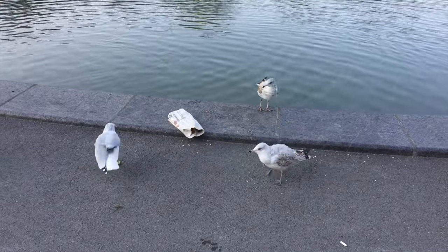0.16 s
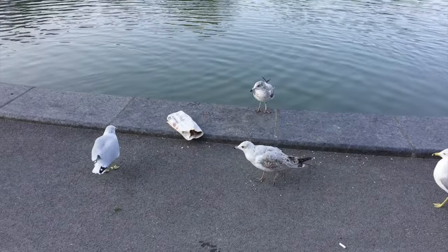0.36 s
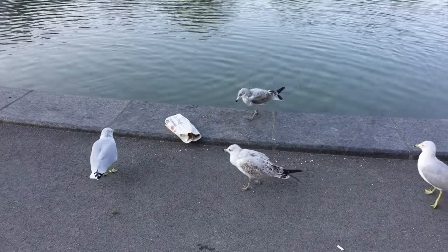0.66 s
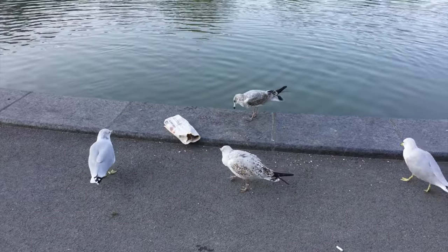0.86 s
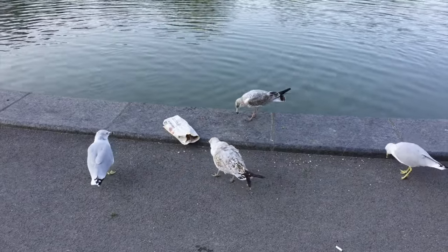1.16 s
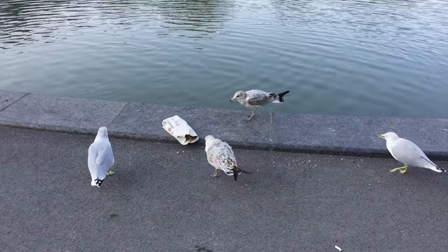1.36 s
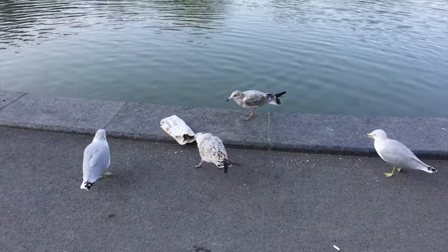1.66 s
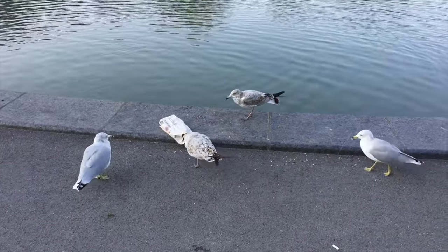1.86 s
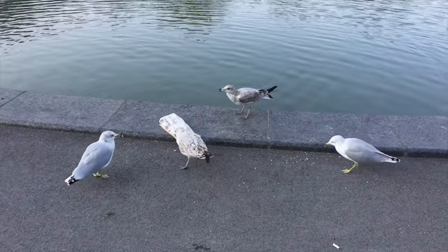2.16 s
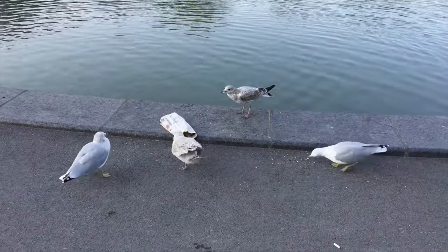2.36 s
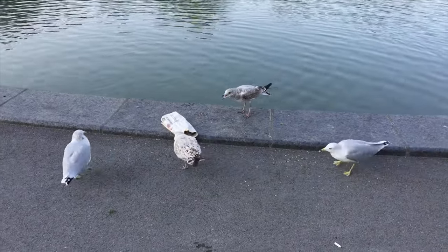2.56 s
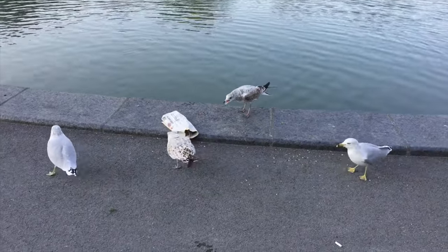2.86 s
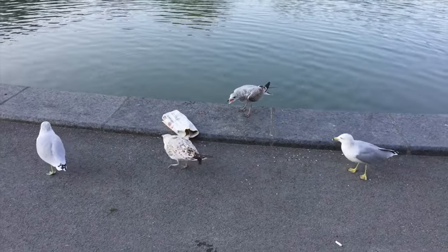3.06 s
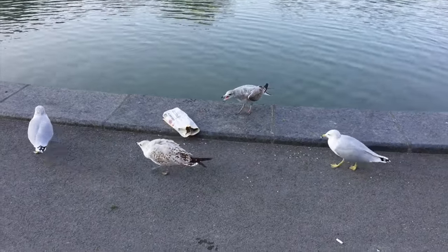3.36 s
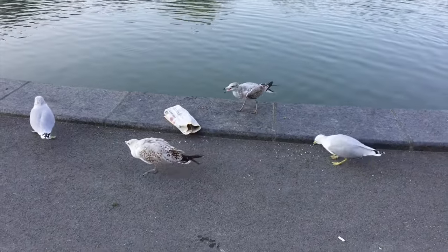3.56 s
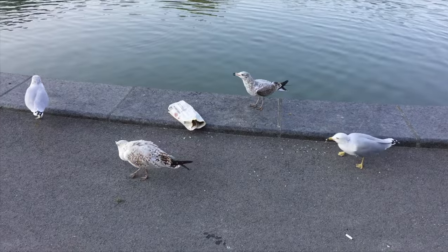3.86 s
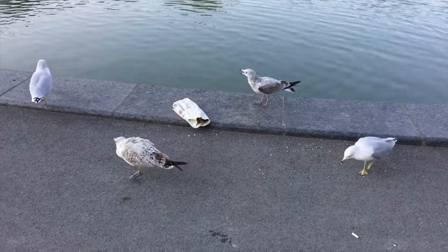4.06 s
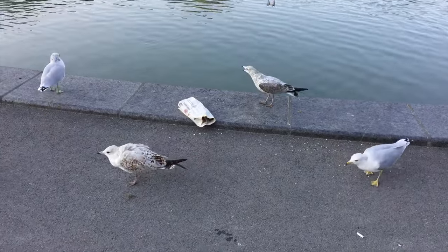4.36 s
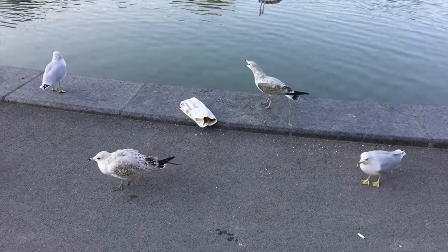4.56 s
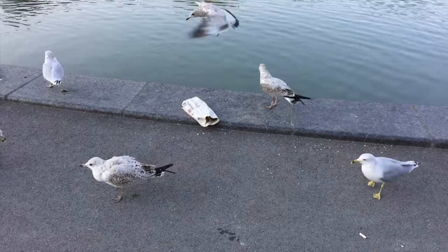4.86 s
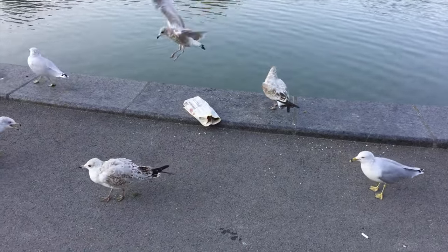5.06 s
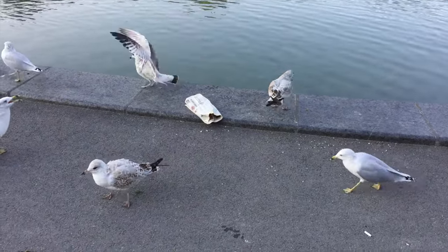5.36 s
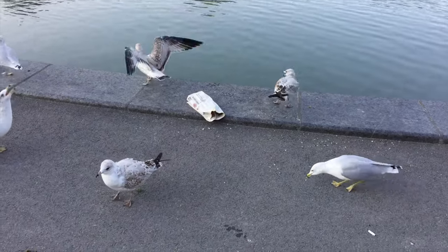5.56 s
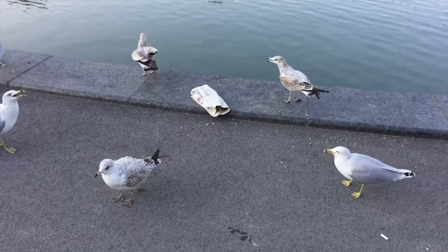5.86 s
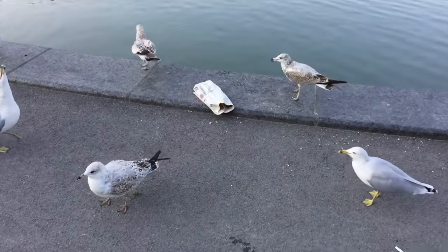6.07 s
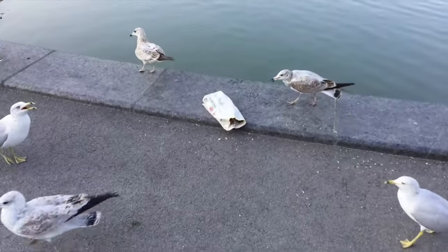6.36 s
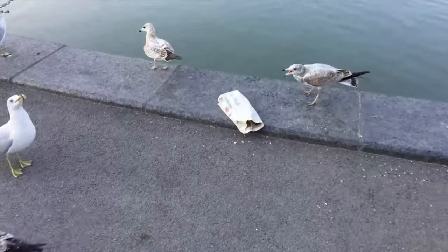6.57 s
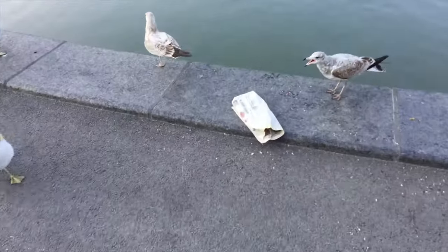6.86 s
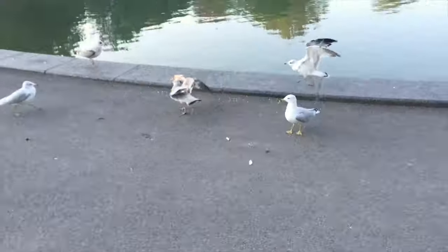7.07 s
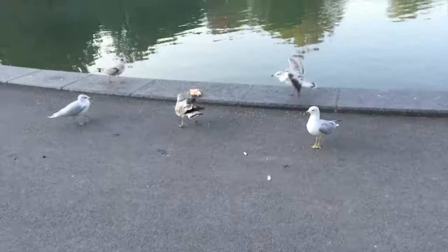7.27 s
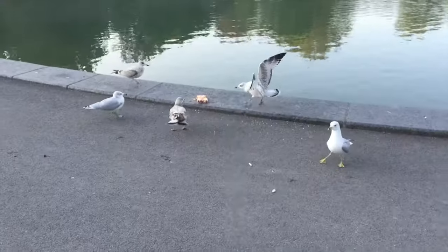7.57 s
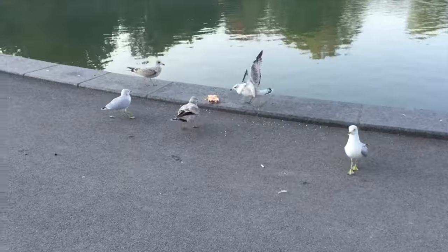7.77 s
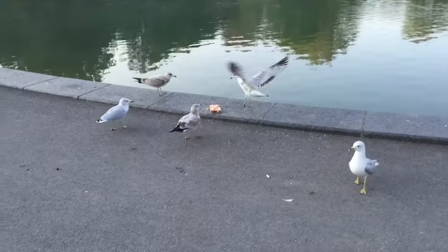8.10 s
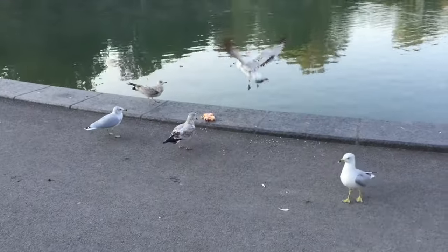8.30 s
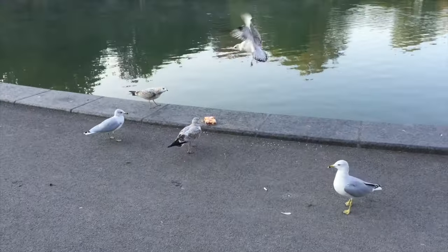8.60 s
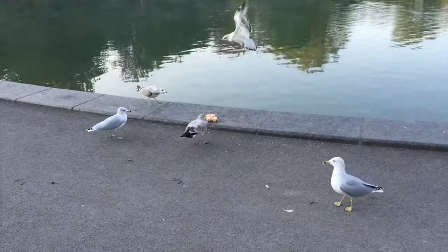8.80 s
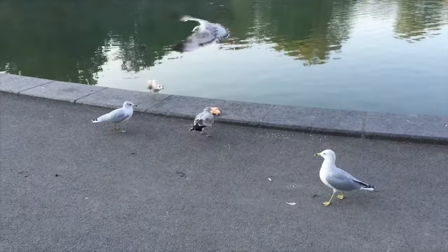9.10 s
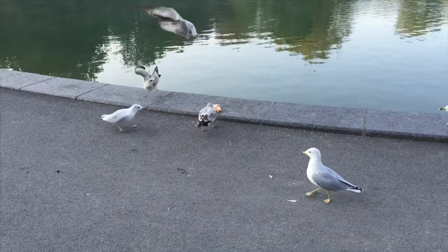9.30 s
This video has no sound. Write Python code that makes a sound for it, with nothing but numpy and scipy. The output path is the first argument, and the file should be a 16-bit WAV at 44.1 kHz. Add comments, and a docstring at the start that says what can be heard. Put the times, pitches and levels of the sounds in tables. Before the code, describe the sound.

Young gulls give high trembling squeals and adult gulls answer with loud, harsh, hollow squawks beside a lake, with quiet traffic rumble and tiny ticks.

```python
"""Gulls by a lake

Gulls squeal and squawk close by on a paved lake shore; far traffic rumbles, and feet and beaks tick.
Clean and half-pitch notes are stacks of sine lines; two-voiced notes mix two pitches into one.
Hoarse squawks are unsteady pulses ringing a throat; rasps are noise bands that follow a squeal.
The traffic is shaped noise and each tick is a short ringing crack."""
import sys
import numpy as np
from scipy import signal
from scipy.io import wavfile
from scipy.ndimage import uniform_filter1d

SR = 44100
rng = np.random.default_rng(int(sys.argv[2]) if len(sys.argv) > 2 else 0)


def amplitude_ratio(level_db):
    """Convert a level in decibels to the matching linear amplitude (field) ratio."""
    exponent = np.asarray(level_db, float) / 20
    return 10 ** exponent


def store_pcm(level_fs):
    """Save levels as 16-bit WAV."""
    pcm = np.round(np.clip(level_fs, -1, 1) * 32767).astype(np.int16)
    wavfile.write(sys.argv[1], SR, np.atleast_2d(pcm).T)


N = 416304

# Colour of the far traffic: pitch_hz, relative_db (per Hz)
CITY_COLOUR = [(15, -46), (25, -32), (46, -7), (89, 1), (322, -25), (552, -22), (1710, -22.5), (2120, -32),
               (2700, -31), (3540, -38.5), (4510, -38), (7520, -51), (15600, -58.5)]
# Slow bass swells; only the change from the first row counts: time_s, level_db
BASS_SWELL = [(0.0, -34), (8.1, -36.5), (9.44, -35.5)]
# Feet and beaks on stone: start_s, peak_db, centre_hz
TICKS = [(0.387, -35, 2500), (.716, -42, 6200), (0.739, -39.5, 2500), (1.066, -31, 2290),
         (1.415, -40, 2500), (1.759, -35, 2600), (3.456, -29.5, 2400), (5.532, -32, 5800),
         (7.109, -19.5, 1940), (7.329, -28, 3300), (7.85, -29.5, 1800), (8.56, -40, 9000),
         (8.751, -36, 2500), (8.934, -43, 10000), (9.305, -44, 5130)]
# Young birds' clean whistles: overtone_db (against the lead), curve of (time_s, pitch_hz, level_db)
WHISTLES = [ (-14, [(2.057, 3070, -40), (2.073, 3555, -20.5), (2.097, 3610, -12), (2.135, 3534, -15),
            (2.201, 3715, -19.5), (2.221, 4130, -32)]), (-3, [(2.67, 3666, -33), (2.69, 3735, -29),
            (2.8, 3660, -41)]), (-10.5, [(2.805, 4200, -32), (2.87, 4330, -24), (2.93, 4290, -25.5),
            (3.0, 4250, -40)]), (-17, [(3.578, 3660, -33.5), (3.602, 3820, -22), (3.708, 3705, -23),
            (3.718, 3909, -35.5)]), (-27, [(3.678, 3368, -7.5), (3.759, 3160, -15), (3.829, 3275, -28.5)]),
            (-19, [(3.72, 4290, -26), (3.771, 4500, -25.5), (4.003, 4250, -28), (4.025, 4171, -42)]),
            (-21, [(4.031, 3770, -36), (4.039, 3560, -29), (4.055, 3369, -27), (4.061, 3200, -55)]),
            (-19, [(4.362, 3600, -18), (4.476, 3307, -18), (4.526, 3367, -18), (4.538, 3550, -27)]),
            (-19, [(5.789, 3250, -20), (5.849, 3054, -15.5), (5.909, 3126, -19.5), (5.919, 3440, -38)]),
            (-9, [(5.919, 4090, -43), (5.986, 4308, -43)]), (-15.5, [(6.693, 3530, -11), (6.705, 3446, -13),
            (6.834, 3394, -13.5), (6.866, 3890, -24.5), (6.88, 3610, -12)]), (-13.5, [(7.289, 3340, -37),
            (7.319, 3544, -27.5), (7.387, 3486, -39.5), (7.415, 3600, -30)]), (-19, [(7.413, 4040, -35),
            (7.459, 4310, -32), (7.569, 4175, -39), (7.593, 4130, -52), (7.7, 4041, -50)]),
            (-30, [(7.697, 3580, -43), (7.718, 3293, -37), (7.734, 3260, -40), (7.756, 2850, -37.5),
            (7.764, 2820, -60)]), (-21, [(7.912, 3520, -22.5), (7.942, 3506, -17.5), (7.996, 3530, -20),
            (8.018, 3890, -20), (8.036, 3950, -29)]), ]
# Young birds' trembling squeals: half_pitch_db (silent below -56), overtone_db (both against the lead),
# curve of (time_s, pitch_hz, level_db)
SQUEALS = [ (-65, -22, [(2.221, 4110, -23), (2.303, 4286, -22.5), (2.459, 4250, -20.5),
           (2.463, 4650, -20.5), (2.477, 4650, -21.5), (2.482, 4180, -18.5), (2.55, 4390, -20.5),
           (2.698, 4110, -26.5), (2.814, 4090, -21.5), (2.883, 4215, -20), (3.071, 3970, -14.5),
           (3.265, 4028, -17.5), (3.287, 3920, -14), (3.297, 3020, -17.5)]),
           (8.5, -5.5, [(3.829, 3405, -32), (3.883, 3340, -34.5), (4.013, 3330, -32.5), (4.025, 3200, -30),
           (4.035, 2840, -56)]), (-67, -41, [(4.538, 4435, -30), (4.711, 4360, -36), (4.851, 4420, -35),
           (4.889, 4555, -34), (4.943, 4510, -36), (5.023, 4740, -29), (5.08, 4710, -25),
           (5.188, 4585, -32), (5.218, 4725, -37), (5.326, 4540, -32.5), (5.38, 4740, -29)]),
           (-65, -14, [(5.988, 3370, -22.5), (6.076, 3300, -24), (6.104, 3420, -26)]),
           (-42, -36, [(8.036, 3970, -22.5), (8.062, 4110, -18), (8.257, 4236, -17), (8.273, 4600, -32.5),
           (8.285, 4130, -19), (8.313, 4150, -20), (8.329, 3870, -25.5), (8.355, 4204, -28.5)]),
           (-60, -30, [(8.355, 4360, -19), (8.371, 4540, -19.5), (8.427, 4350, -20.5), (8.46, 4400, -26),
           (8.6, 4270, -21), (8.618, 3620, -16), (8.63, 3760, -19.5), (8.654, 2890, -19)]), ]
THIRD_DB = -22  # third multiple of the lead, against the overtone
# Warble of a tiring squeal: start_s, end_s, swings_per_s, widest_swing_hz, dip_db
WARBLE = (8.456, 8.612, 22.9, 220, 3.5)
# Hoarse stretches of the young birds' squeals: start_s, end_s, drive_db, change_db,
# lock (how far a drift of rms 1 must rise before the half pitch slips)
RASPS = [(2.221, 2.52, -33, -2, 1.4), (2.51, 3.293, -29.5, -2, -.3), (4.538, 5.08, -37.5, 1, -.6),
         (5.08, 5.24, -40.5, -5, .1), (5.921, 6.032, -46, 12, .1), (6.878, 6.988, -32, -8, .1),
         (8.04, 8.28, -36.5, -7, .3), (8.355, 8.61, -36, -3, -.3)]
# Noise bands of a rasp: multiple (of the squeal's pitch), offset_hz, width_hz, band_db
RASP_BANDS = [(.5, -100, 420, -8), (1, -350, 1330, -3.5), (1, -850, 980, 1.5), (1.5, -350, 1840, -8),
              (2, -550, 1600, -11.5), (2.5, -600, 2300, -20), (3, -400, 1300, -19), (3.5, -300, 1200, -17)]
# Hoarse stretches of the adults' squawks: start_s, end_s, opening_db, middle_db, closing_db
SQUAWKS = [(3.293, 3.314, -19, -22, -20), (3.616, 3.68, -28, -41, -33), (3.787, 4.051, -25, -34, -29),
           (4.31, 4.462, -30, -40, -16), (4.709, 4.819, -23, -37, -33), (5.066, 5.144, -26, -17, -23),
           (5.24, 5.43, -18, -27.5, -21), (5.43, 5.511, -14, -14, -17), (5.627, 5.889, -17.5, -23.5, -21),
           (6.032, 6.31, -11.5, -29, -17.5), (6.475, 6.551, -14, -16, -13), (6.551, 6.775, -37, -30, -13.5),
           (6.988, 7.074, -11.5, -6.5, -15), (7.074, 7.094, -23, -24, -17), (8.8, 8.89, -37, -36, -32),
           (9.121, 9.203, -27, -34, -31)]
# The adults' throat resonances: pitch_hz, width_hz (of one pass), gain_db
THROAT = [(918, 280, -11.5), (1480, 1500, -5.5), (2012, 560, 8), (2900, 900, -6.5), (3940, 880, -13.5),
          (5620, 1500, -17.5), (6540, 580, -20.5), (8700, 1300, -26), (13230, 1800, -32.5)]
# Adults' hollow cries: start_s, end_s, from_hz, to_hz, level_db
CRIES = [(3.616, 3.632, 1450, 1900, -27), (3.631, 3.648, 1930, 2080, -12), (3.789, 3.809, 1460, 1800, -24),
         (3.807, 3.895, 1800, 1700, -19), (4.36, 4.44, 1658, 1605, -15.5), (4.745, 4.8, 1700, 1790, -11.5),
         (4.798, 4.818, 1830, 1960, -13.5), (5.075, 5.12, 1850, 1750, -7), (5.118, 5.14, 1690, 1520, -16),
         (5.244, 5.326, 1325, 1405, -12), (5.326, 5.42, 1381, 1445, -23), (5.378, 5.45, 1754, 1853, -15.5),
         (5.414, 5.506, 1450, 1540, -13), (5.629, 5.653, 1260, 1310, -23), (5.655, 5.709, 1295, 1370, -15),
         (5.735, 5.763, 1976, 2030, -15), (5.75, 5.811, 1350, 1385, -25), (5.809, 5.869, 1870, 1760, -10.5),
         (5.869, 5.885, 1410, 1310, -12), (6.07, 6.118, 1305, 1420, -14), (6.084, 6.135, 1765, 1860, -18),
         (6.17, 6.246, 1375, 1450, -31), (6.238, 6.292, 1930, 1830, -8), (6.29, 6.306, 1375, 1352, -16),
         (6.569, 6.701, 1370, 1480, -28), (6.651, 6.69, 1836, 1950, -22), (6.697, 6.761, 2005, 1830, -7.5),
         (8.654, 8.664, 1930, 1800, -26)]
# Harmonics 1, 2, 3.. of the cries of the first adult, then of a nearer one: level_db (against the lead)
MELLOW = [0, -40, -32, -42]
HOLLOW = [0, -55, -20, -42]
NEARER_FROM_S = 5.2  # the nearer adult takes over
# Full stacks on a low fundamental: lead_harmonic, levels_db (of harmonics 1, 2, 3..),
# note of (start_s, end_s, lead_from_hz, lead_to_hz, level_db)
STACKS = [(4, [-80, -64, -24, 0, -63, -73, -19, -21], (3.65, 3.678, 2648, 2800, -18.5)),
          (2, [-30, 0, -66, -27, -67, -32], (4.316, 4.336, 2050, 2110, -19)), (4, [-58, -61, -65, 0, -10],
          (4.336, 4.36, 2700, 2940, -22)), (2, [-20.5, 0, -7], (4.725, 4.747, 1610, 1786, -13.5)),
          (2, [-78, 0, -3, -19, -33, -26.5, -44, -29, -36.5], (4.817, 5.076, 1854, 1881, -18.5)),
          (2, [-16, 0, -70, -65, -6, -2, -9], (6.499, 6.521, 1540, 1563, -17)), (1, [0, -22, -10, -18, -37],
          (6.523, 6.567, 1400, 1440, -17)), (4, [-67, -55, -11, 0, -65, -62, -51, -29],
          (6.605, 6.639, 4408, 4740, -20)), (2, [-28, 0, -56, -13, -58, -9.5, -18.5, -26.5],
          (7.026, 7.086, 1760, 1680, -11)), (2, [-24, 0, -9, -3, -19.5, -26, -31],
          (7.887, 7.911, 2290, 2460, -23))]
# Both sides of the voice box at once give lines at m * high + n * low: m, n
MIXES = [(1, 0), (0, 1), (1, -1), (2, -2), (2, -1), (1, 1), (2, 0), (3, -1), (2, 1), (3, 0), (4, -1),
         (3, 1), (4, 0)]
# Two-voiced notes: levels_db (of each mix, against the note's level),
# curve of (time_s, high_hz, low_hz, level_db)
TWO_VOICED = [
    [(-0.5, -7.5, -58, -21.5, -26, -31.5, -13.5, -26.5, -28.5, -36, -35, -37, -33),
     [(3.893, 2720, 1789, -33), (3.951, 2748, 1776, -24.5), (4.242, 2745, 1750, -17.5),
     (4.312, 2733, 1827, -18.5), (4.35, 2664, 1676, -20), (4.36, 2656, 1720, -16)]],
    [(-1.5, -24, -47, -62, -21.5, -52, -29, -29, -30.5, -54, -62, -49, -47), [(6.88, 3510, 1957, -13),
     (6.954, 3413, 1960, -11), (6.978, 3350, 2080, -11.5), (6.994, 3100, 1920, -20.5)]],
]
# Reedy upper-register glides: start_s, end_s, from_hz, to_hz, level_db
GLIDES = [(5.324, 5.385, 2420, 2630, -22), (5.4, 5.48, 2730, 2760, -28), (5.711, 5.757, 2240, 2520, -24),
          (5.76, 5.788, 2525, 2600, -16), (5.79, 5.815, 2680, 2920, -26), (6.128, 6.246, 2340, 2870, -17.5),
          (6.567, 6.645, 2430, 2650, -15), (6.645, 6.681, 2660, 2930, -23), (6.641, 6.675, 3050, 2874, -14),
          (6.675, 6.703, 2870, 2850, -23), (7.084, 7.094, 2950, 2720, -11)]
# Harmonics 1, 2, 3.. of the glides: level_db (against the lead)
REEDY = [0, -6, -29, -40]
# A farther gull's arched mew: levels_db (of harmonics 1, 2, 3.., against the second),
# curve of (time_s, second_harmonic_hz, level_db)
MEW = ([-1, 0, -8, -15, -42, -20, -32, -38, -46, -23, -44, -34, -34], [(8.8, 980, -44), (8.832, 1562, -38),
       (8.862, 1920, -44), (8.876, 2100, -34), (8.906, 2042, -35), (9.063, 1996, -33), (9.125, 2040, -25.5),
       (9.18, 1860, -26.5), (9.191, 1250, -31.5), (9.199, 1215, -29)])
# How notes start and stop, with shorter ends on very short notes: attack_s, rise_db, scoop_share,
# release_s, drop_db, droop_share, swell_db_per_s, climb_db_per_octave
CRY_SHAPE = (.008, 4, .02, .008, 6, .03, 25, 25)
GLIDE_SHAPE = (.008, 4, .01, .008, 7, .005, -20, 25)
STACK_SHAPE = (.004, 1.5, .005, .004, 2.5, .01, 18, 30)


def evened(x):
    """Scales to rms 1."""
    return x / np.sqrt(np.mean(np.abs(x) ** 2) + 1e-20)


def add(mix, start_s, sound):
    """Mixes a sound in at its start time."""
    part = mix[round(start_s * SR):][:len(sound)]
    part += sound[:len(part)]


def played(rows):
    """Joins the rows by straight lines; returns 1.4 ms soft ends and the columns."""
    s, *columns = np.transpose(rows)
    t = np.arange(s[0], s[-1], 1 / SR)
    ends = np.clip(np.minimum(t - s[0], s[-1] - t) / 0.0014, 0, 1)
    return ends, [np.interp(t, s, column) for column in columns]


def wander(count, hz):
    """Random drift up to about hz, rms 1."""
    r = np.exp(-2 * np.pi * hz / SR)
    noise = rng.standard_normal(count + 2000)
    drift = signal.lfilter([1], np.convolve([1, -r], [1, -r]), noise)
    return evened(drift[2000:])


def resonate(x, hz, width):
    """A resonance of gain 1 applied twice, for dark valleys."""
    b, a = signal.iirpeak(min(hz, SR / 2.2), hz / width, SR)
    return signal.lfilter(b, a, signal.lfilter(b, a, x))


def line(turns, hz, db):
    """One sine line of rms db, silent above the top of the band."""
    return np.sqrt(2) * amplitude_ratio(db) * np.cos(2 * np.pi * turns) * (hz < SR / 2.6)


def city():
    """Far traffic: random short-time spectra with faint patches; the bass swells slowly."""
    level_db, patch_db, bass_below_hz = -37, 1.0, 220  # level before the bass swells
    frames, hz = N // 256 + 5, np.fft.rfftfreq(1024, 1 / SR)
    a, b, patches = rng.standard_normal((frames, 513, 3)).T
    patches = uniform_filter1d(patches, size=12, axis=0)  # blur over pitch
    patches = evened(uniform_filter1d(patches, size=14, axis=1))  # blur over time
    f, db = np.transpose(CITY_COLOUR)
    colour_db = np.interp(np.log(hz + 1), np.log(f + 1), db)[:, None]
    spectra = (a + 1j * b) * amplitude_ratio(colour_db + patch_db * patches)
    steady = signal.istft(spectra, nperseg=1024, noverlap=768)[1]
    scale = amplitude_ratio(level_db) / np.sqrt(np.mean(steady ** 2))
    s, swell_db = np.transpose(BASS_SWELL)
    swell_db = np.interp(np.arange(frames) * 256 / SR, s, swell_db - swell_db[0])
    spectra *= amplitude_ratio(swell_db * (hz < bass_below_hz)[:, None])
    return scale * signal.istft(spectra, nperseg=1024, noverlap=768)[1][:N]


def tick(start_s, peak_db, hz, t60_s=0.034):
    """A foot or beak on stone: a dying crack of noise rings one soft resonance."""
    t = np.arange(1500) / SR
    crack = rng.standard_normal(len(t)) * amplitude_ratio(-60 * t / t60_s)
    knock = resonate(crack, hz, .7 * hz) + .05 * crack
    return start_s, amplitude_ratio(peak_db) * knock / np.abs(knock).max()


def shore(x, t60_s=0.28, bright=0.35):
    """Open air: a faint scatter from paving, water and trees, made with a dying noise tail."""
    t = np.arange(SR // 2) / SR
    noise = rng.standard_normal(len(t))
    tail = resonate(noise, 2600, 4900) + bright * noise
    tail = tail * amplitude_ratio(-60 * t / t60_s) * (t > .004)  # nothing returns in the first 4 ms
    return signal.fftconvolve(x, tail / np.linalg.norm(tail))[:N]


def note(lead, harmonics_db, rows, shimmer_db=0.98, flutter=0.13, fall_db=-2.5):
    """A harmonic stack; lines between the lead's multiples come from alternate cycles and flutter."""
    ends, (hz, db) = played(rows)
    waver = .008 if lead == 2 and hz[0] > 3800 else .003  # high squeals tremble more
    hz = hz / lead * (1 + waver * wander(len(hz), hz=45))  # now the fundamental
    db = db + shimmer_db * wander(len(hz), hz=86.5)
    turns = np.cumsum(hz) / SR
    levels_db = list(harmonics_db)
    if len(harmonics_db) > 5:  # rich stacks go on upward, ever weaker
        levels_db += [harmonics_db[-1] + fall_db * k for k in range(1, 7)]
    out = np.zeros(len(hz))
    for k, rel_db in enumerate(levels_db, 1):
        if rel_db < -56:  # too weak to hear
            continue
        unsteady = 1 + flutter * wander(len(hz), hz=146) if k % lead else 1
        out += unsteady * line(k * turns + rng.random(), k * hz, db + rel_db)
    out *= 1 + .015 * wander(len(hz), hz=2500)  # turbulent air leaves a faint haze round the lines
    return rows[0][0], out * ends


def whistles():
    """Young birds' clean whistles: a strong lead with two weaker multiples."""
    for db, rows in WHISTLES:
        yield 1, [0, db, db + THIRD_DB], rows


def warbled(rows):
    """Adds a widening warble to a pitch and level curve; the sound thins as the pitch swings up."""
    start, end, rate, swing_hz, dip_db = WARBLE
    s, hz, db = np.transpose(rows)
    t = np.linspace(s[0], s[-1], num=400)
    inside = np.clip(np.minimum(t - start, end - t) * 200, 0, 1)
    swing = np.sin(2 * np.pi * rate * (t - start)) * inside
    wide = .4 + .6 * (t - start) / (end - start)
    hz = np.interp(t, s, hz) + swing_hz * wide * swing
    return np.transpose([t, hz, np.interp(t, s, db) - dip_db * swing])


def squeals():
    """Young birds' squeals: a high strong lead with overtones at its multiples; two add a half-pitch line."""
    unheard_db = -58  # the other lines between the multiples are left out by note()
    for half_db, db, rows in SQUEALS:
        yield 2, [half_db, 0, unheard_db, db, unheard_db, db + THIRD_DB], warbled(rows)


def squeal_pitch(start, end, count):
    """Pitch of the high note that overlaps a hoarse stretch the most."""
    middle = (start + end) / 2
    notes = [entry[-1] for entry in WHISTLES + SQUEALS]
    high = [warbled(rows) for rows in notes if rows[0][1] > 3500 and rows[0][0] < middle]
    best = max(high, key=lambda r: min(r[-1][0], end) - max(r[0][0], start))
    s, hz, _ = np.transpose(best)
    return np.interp(start + np.arange(count) / SR, s, hz)


def rasp(start, end, drive_db, change_db, lock):
    """Under a squeal alternate cycles lock to half pitch or slip off it; the slips spray noisy sidebands."""
    half_db, slip_hz, locked_db, patchy_db, brighten = -1, 220, -3, 2, .24
    edge, edge_db = min(.04, (end - start) / 4), 5  # fades in and out
    last_db = drive_db + change_db
    rows = [(start, drive_db - edge_db), (start + edge, drive_db), (end - edge, last_db),
            (end, last_db - edge_db)]
    ends, (db,) = played(rows)
    count = len(db)
    hz = squeal_pitch(start, end, count)
    slipped = uniform_filter1d(1. * (wander(count, hz=30) > lock), size=90)
    slip = np.cumsum(slipped * slip_hz * (1 + .25 * wander(count, hz=77))) / SR
    half = np.cumsum(hz / 2) / SR
    out = line(half - slip, hz, half_db) + .5 * slipped * line(half + slip, hz, half_db)
    out += line(3 * half - slip, hz, half_db - 13)
    for multiple, offset_hz, width, band_db in RASP_BANDS:
        spray = wander(count, hz=width / 2) + 1j * wander(count, hz=width / 2)
        window = signal.windows.hann(round(2.2 * SR / width))
        spray = np.convolve(spray, window, "same")  # steep band edges
        carrier = np.exp(2j * np.pi * np.cumsum(multiple * hz + offset_hz) / SR)
        level_db = band_db + locked_db * (1 - slipped) + patchy_db * wander(count, hz=7.5)
        level_db += brighten * (multiple - 1) * (db.mean() + 28)  # harder effort is brighter
        out += amplitude_ratio(level_db) * evened((spray * carrier).real)
    return start, amplitude_ratio(db) * ends * out


def squawk_levels(start, end, open_db, middle_db, close_db):
    """Level rows of a squawk: opening, middle and closing levels; most sag in the middle, some swell there."""
    open_s, settle_s, build_s, close_s = .03, .06, .035, .018  # shortened for short squawks
    first_drop_db, last_drop_db = 4, 8  # how far the very ends lie below
    short = min(1, (end - start) / (open_s + settle_s + build_s + close_s + .01))
    return [(start, open_db - first_drop_db),
            (start + short * open_s, open_db),
            (start + short * (open_s + settle_s), middle_db),
            (end - short * (build_s + close_s), middle_db),
            (end - short * close_s, close_db),
            (end, close_db - last_drop_db)]


def squawk(rows, pulse_hz=680):
    """Erratic pulses ring the throat; their rate drifts and stumbles, leaving ragged gliding strands."""
    ends, (db,) = played(rows)
    count = len(db) + 1000  # the first 1000 samples let the throat start ringing
    stumble = .1 * wander(count, hz=10) + .036 * wander(count, hz=300)
    turns = np.cumsum(pulse_hz * np.exp(stumble)) / SR
    pulses = sum(np.cos(2 * np.pi * k * turns) for k in range(1, 20))
    pulses = evened(pulses * (1 + .25 * wander(count, hz=250)))
    breathy = pulses + .4 * rng.standard_normal(count)
    shift = 1 + .02 * rng.standard_normal()  # each gape differs a little
    rung = np.zeros(count)
    for k, (hz, width, gain_db) in enumerate(THROAT):
        rung += (-1) ** k * amplitude_ratio(gain_db) * resonate(breathy, hz * shift, width)
    return rows[0][0], amplitude_ratio(db) * ends * evened(rung[1000:])


def shaped(start, end, from_hz, to_hz, db, shape):
    """Curve rows of one gliding note: scooped attack, level following time and pitch, drooping release."""
    attack, rise_db, scoop, release, drop_db, droop, swell_db, climb_db = shape
    short = min(1, (end - start) / (3 * (attack + release)))
    half_db = (swell_db * (end - start) + climb_db * np.log2(to_hz / from_hz)) / 2
    return [(start, from_hz * (1 - scoop * short), db - half_db - rise_db),
            (start + attack * short, from_hz, db - half_db),
            (end - release * short, to_hz, db + half_db),
            (end, to_hz * (1 - droop * short), db + half_db - drop_db)]


def cries():
    """Adults' hollow cries: odd harmonics lead once the nearer bird takes over."""
    for row in CRIES:
        yield 1, HOLLOW if row[0] > NEARER_FROM_S else MELLOW, shaped(*row, CRY_SHAPE)


def stacks():
    """Short notes with a full stack of harmonics on a low fundamental."""
    for lead, levels_db, row in STACKS:
        yield lead, levels_db, shaped(*row, STACK_SHAPE)


def two_voiced(mixes_db, rows, jitter=0.0027):
    """Two unrelated pitches beat in one windpipe and give sum and difference lines."""
    ends, (high, low, db) = played(rows)
    high = high * (1 + jitter * wander(len(high), hz=40))
    low = low * (1 + jitter * wander(len(low), hz=40))
    lines = list(zip(MIXES, mixes_db))
    lines += [((m, n), -38) for m in (4, 5, 6) for n in (-1, 0, 1) if (m, n) not in MIXES]  # faint
    out = np.zeros(len(db))
    for (m, n), rel_db in lines:
        hz = m * high + n * low
        out += line(np.cumsum(hz) / SR + rng.random(), hz, db + rel_db)
    return rows[0][0], ends * out


def glides():
    """Reedy upper-register glides: the second harmonic is nearly as strong as the first."""
    for row in GLIDES:
        yield 1, REEDY, shaped(*row, GLIDE_SHAPE)


def mew():
    """A farther gull's mew: only the two lowest harmonics carry while it slides up and down."""
    levels_db, rows = MEW
    yield 2, levels_db[:2], rows[:4]
    yield 2, levels_db, rows[3:7]
    yield 2, levels_db[:2], rows[6:]


def scene():
    """All gulls, their scatter, the ticks and the city."""
    gulls, adult = np.zeros((2, N))
    for entry in [*whistles(), *squeals(), *cries(), *stacks(), *glides(), *mew()]:
        start, hz, _ = entry[2][0]
        shares_windpipe = NEARER_FROM_S < start < 6.8 and hz < 3100
        add(adult if shares_windpipe else gulls, *note(*entry))
    for row in SQUAWKS:
        add(adult, *squawk(squawk_levels(*row)))
    gulls += adult + 0.7 * resonate(adult ** 2, 5500, 4500)  # notes sharing one windpipe mix into sum lines
    for entry in TWO_VOICED:
        add(gulls, *two_voiced(*entry))
    for row in RASPS:
        add(gulls, *rasp(*row))
    for row in TICKS:
        add(gulls, *tick(*row))
    return (gulls + amplitude_ratio(-32.5) * shore(gulls) + city())[None]


def top_cut(x):
    """Nothing passes above the cut-off."""
    return signal.sosfilt(signal.butter(12, 15300, fs=SR, output="sos"), x)


def record(dry):
    """The deepest bass is dropped, and the loudest peaks are clipped just under full scale."""
    bass_cut = signal.butter(3, 38, "high", fs=SR, output="sos")
    finished = np.clip(signal.sosfilt(bass_cut, dry), -.97, .97)
    return top_cut(finished)


dry = scene()
out = record(dry)
store_pcm(out)
```